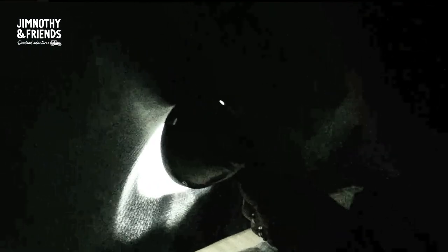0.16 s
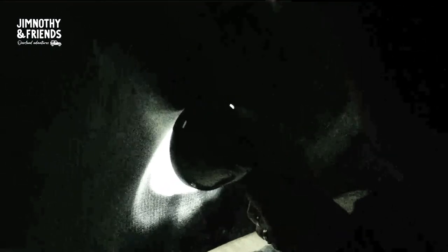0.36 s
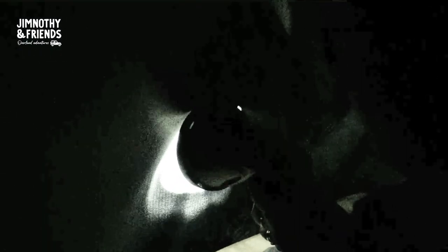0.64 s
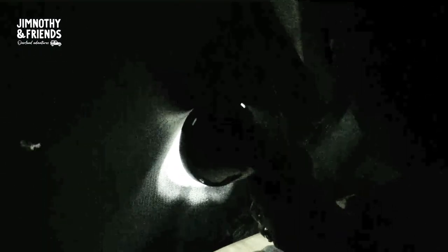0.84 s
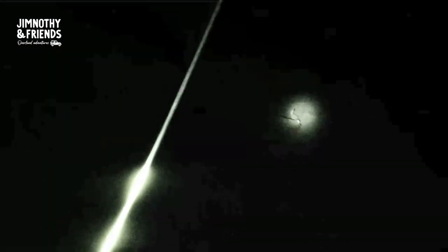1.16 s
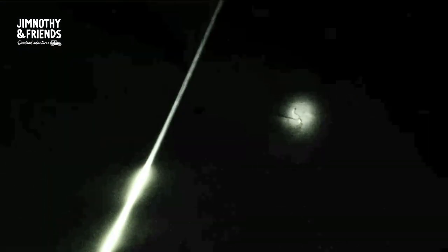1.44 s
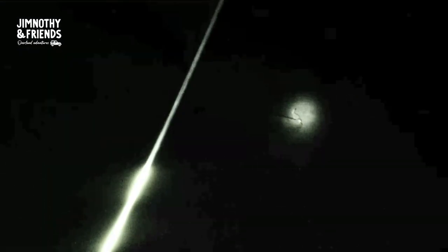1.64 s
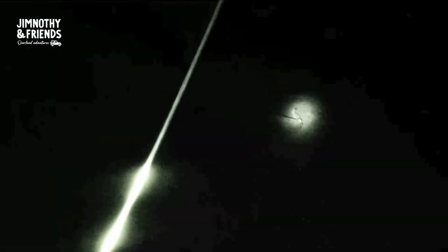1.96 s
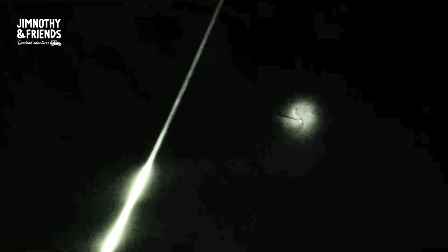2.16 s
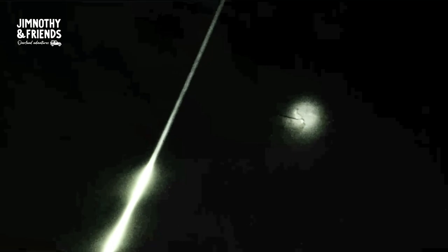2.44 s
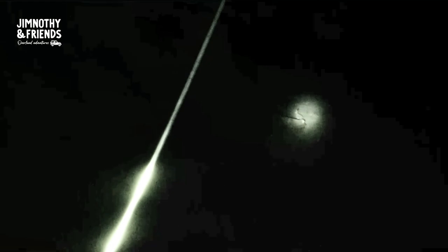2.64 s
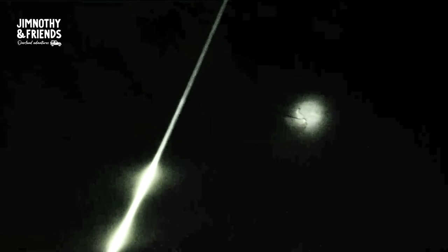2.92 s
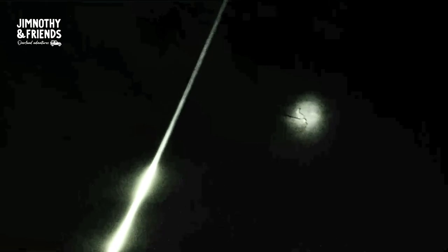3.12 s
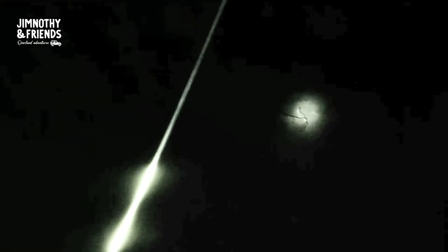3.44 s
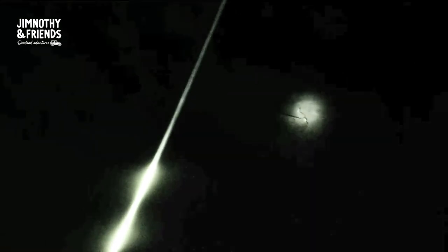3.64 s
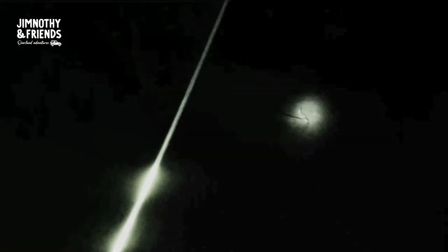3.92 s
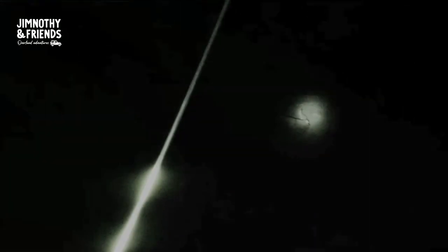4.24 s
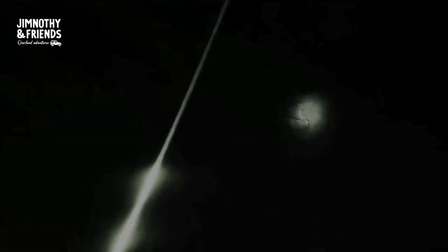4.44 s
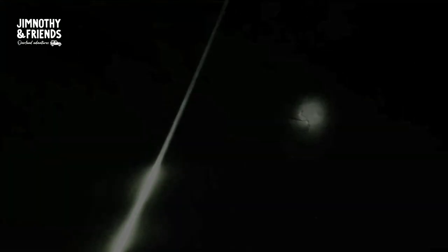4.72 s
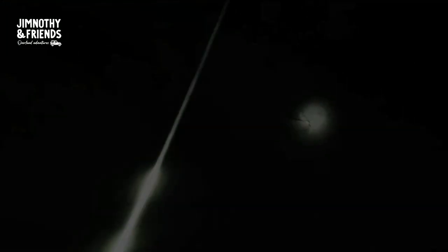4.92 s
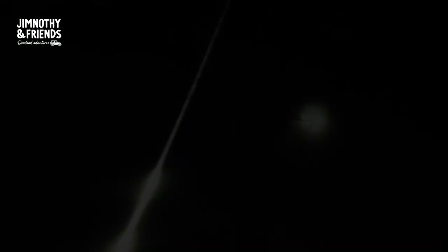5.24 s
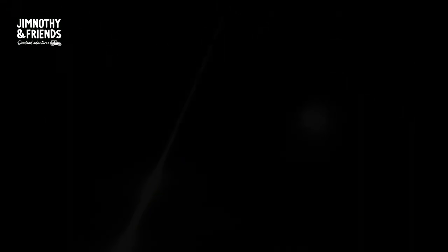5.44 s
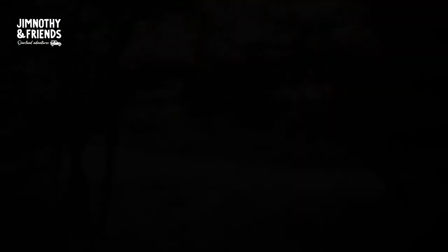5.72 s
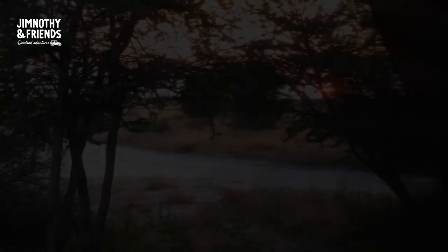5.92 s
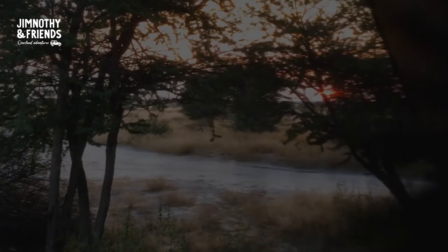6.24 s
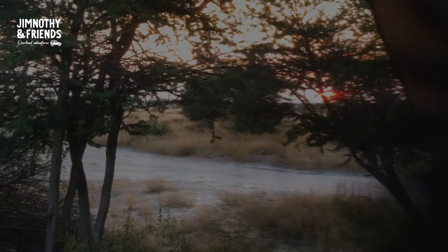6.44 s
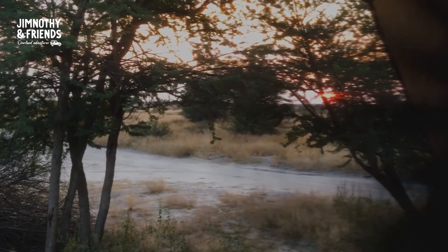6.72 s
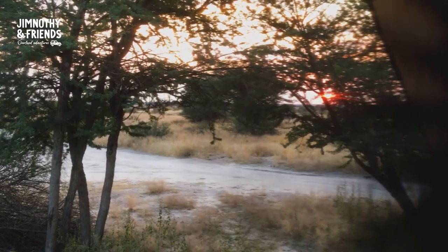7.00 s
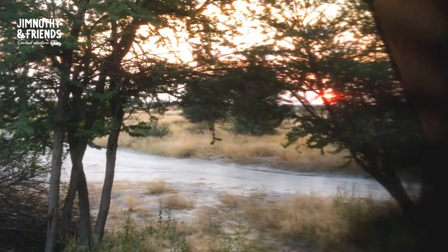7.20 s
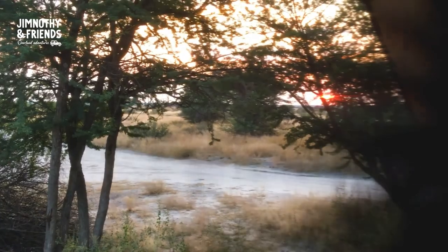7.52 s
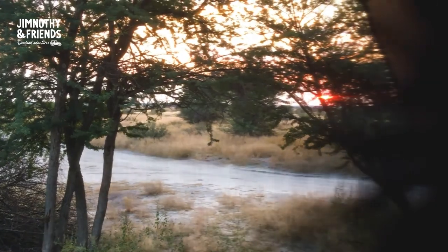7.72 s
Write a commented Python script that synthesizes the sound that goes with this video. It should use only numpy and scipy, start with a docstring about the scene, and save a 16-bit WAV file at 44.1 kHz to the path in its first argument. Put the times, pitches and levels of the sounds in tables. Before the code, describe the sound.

From 0 to about 0.7 s a gecko very near the microphone gives four loud barks about a quarter second apart, each a 20-millisecond rattle of clicks ringing around 4 kHz, with a weaker, shorter caller between. Faint hiss, low rumble and a blurred distant chorus lie beneath. From 1 to 1.8 s four duller, quieter barks come from another gecko; until 3 s only far, echoing barks remain, with tiny high chirps and a faint falling bird note near 2.1 s. At 3.1 s the near gecko returns with five loud barks until 4.2 s, the weaker one alternating. Distant calls follow as everything fades almost to silence by 5.5 s. Morning then fades in: airy wind hiss, low buffeting, soft thuds on the microphone, strongest around 6.8 and 7.3 s. Sparse thin bird notes from 5.9 s lead to a rapid bright trill from 7.27 s, about seventeen notes a second, to the end at 8 s.

```python
"""Open country by night, then morning: one gecko barks close by, others answer over chorus, hiss and rumble.
Barks are bursts of larynx clicks ringing a throat resonance; the chorus is random click bursts, blurred.
Faint high chirps, perhaps an insect, and another bird's note sound in the night, which fades almost to
silence. Morning fades in: wind hiss, buffeting noise and low pulses thud on the microphone, and a small
bird tries a few notes and breaks into a fast trill. Chirps and bird notes are swept sines."""
import sys
import numpy as np
from scipy import signal
from scipy.fft import rfft, irfft, next_fast_len
from scipy.io import wavfile
from scipy.ndimage import uniform_filter1d, map_coordinates

SR = 44100
rng = np.random.default_rng(int(sys.argv[2]) if len(sys.argv) > 2 else 0)


def put_to_file(sound):
    """Save the sound as 16-bit audio at rate SR, in the file named by the first command-line argument."""
    columns = np.atleast_2d(sound).T  # one column per channel
    safe = np.clip(columns, -1, 1)
    whole_steps = np.round(safe * 32767)
    wavfile.write(sys.argv[1], SR, whole_steps.astype(np.int16))


N = 346626

# Diffuse echo decay of open field, near stones and scrub, and trees: (frequency [Hz], t60 [s])
FIELD_T60 = [(500, 0.28), (2000, 0.18), (4200, 0.25), (7000, 0.19), (12000, 0.068)]
SCRUB_T60 = [(500, 0.025), (4200, 0.02), (8000, .025), (14000, 0.032)]
TREES_T60 = [(2000, 0.052), (6000, 0.19), (10000, 0.25)]

# Night noise and far-chorus spectra: (frequency [Hz], relative level [dB])
NIGHT_HISS_SPECTRUM = [(180, -34), (300, -2.5), (1550, -5), (2640, -4.5), (4140, 0.5), (4650, -5),
                       (5050, -15.5), (5870, -8), (7660, -16), (8890, -13), (10300, -18), (12200, -16),
                       (15100, -19.5), (15900, -33)]
RUMBLE_SPECTRUM = [(15, -39), (25, -8), (80, 3.5), (205, -1), (284, -4), (327, -5), (500, -28.5),
                   (650, -38.5), (1100, -120)]
CHORUS_SPECTRUM = [(1200, -23), (2500, -13.5), (3600, -11.5), (4300, 2.5), (4900, -14.5), (6000, -22),
                   (7500, -44)]
# Shared swell of hiss and rumble: (time [s], gain [dB])
NIGHT_SWELL = [(0, 0.5), (1.76, -.3), (2.41, 2.5), (3.1, 1.1), (5.6, -2)]
# Chorus level: (time [s], level [dB])
CHORUS_LEVEL = [(0, -61), (.75, -69), (1.18, -63.5), (2.99, -71), (3.13, -72), (3.3, -56.5), (3.7, -59.5),
                (4.3, -77), (4.9, -67), (5.16, -57.5), (5.6, -55)]

# Morning hiss and wind buffeting spectra: (frequency [Hz], relative level [dB])
AIR_SPECTRUM = [(120, -11), (200, -1.5), (328, -3.5), (646, -10), (707, -11), (948, -12), (1830, -15.5),
                (3480, -15), (4840, -20), (5920, -15), (7510, -19.5), (14200, -15), (15900, -17)]
BUFFET_SPECTRUM = [(12, -36), (20, -19), (44, 3), (70, -3), (99, -8.5), (242, -27), (400, -46), (520, -72),
                   (880, -120)]
# Wind thuds: (centre [s], peak level [dB], frequency [Hz], half length to 1/e [cycles])
WIND_THUDS = [(5.776, -18.5, 134, 0.66), (5.813, -17.5, 117, 0.45), (5.849, -32, 138, 0.64),
              (5.934, -32, 60, 0.6), (6.086, -26, 54.1, 0.7), (6.124, -28, 60, 0.54),
              (6.171, -25, 101.3, 0.36), (6.2, -30.5, 90, 0.3), (6.251, -33, 58.7, 1),
              (6.683, -26.5, 55.5, 0.55), (6.75, -37, 55, .8), (6.84, -15.5, 58.5, 0.29),
              (7.144, -31, 55.4, 0.59), (7.247, -24, 55.5, 0.67), (7.265, -32, 65, 0.27),
              (7.303, -14.5, 76, 0.56), (7.371, -28.5, 55, 0.57), (7.571, -33, 55, 0.55),
              (7.685, -35, 56.4, 0.9), (7.784, -25.5, 60, 0.58)]

# Single whistled notes, faint high chirps of a bird or insect, and bird notes:
# (time [s], level before whistle gain [dB], start [Hz], turn [Hz], end [Hz],
# time to the turn [ms], time after it [ms])
CHIRPS_AND_NOTES = [(.965, -60, 5900, 5900, 5800, 25, 35), (1.955, -57, 5800, 5750, 5700, 11, 11),
                    (2.115, -56, 5900, 5900, 5850, 15, 15), (2.445, -56, 5950, 5880, 5850, 12, 12),
                    (2.095, -43.5, 3760, 3400, 2800, 26, 45), (5.894, -42.5, 4430, 3580, 2480, 16, 33),
                    (6.108, -39.5, 4820, 6970, 4960, 20, 18), (6.344, -43.5, 6400, 6060, 2940, 10, 13),
                    (6.42, -55, 6200, 5300, 4200, 9, 11), (6.584, -43.5, 6040, 6200, 4270, 14, 11),
                    (6.72, -50, 6150, 6100, 5360, 14, 36), (7.106, -41.5, 6080, 6330, 3530, 10, 18),
                    (7.168, -35, 5540, 3800, 2300, 1.5, 2.7), (7.179, -36, 2500, 4630, 4080, 3, 3),
                    (7.184, -30.5, 4060, 4010, 4060, 6.4, 6.7), (7.203, -27.5, 6300, 5690, 2100, 5, 2.7),
                    (7.488, -31.5, 4850, 6210, 5920, 8.6, 17)]
# Trill notes: (time of top [s], level before whistle gain [dB], top before sag [Hz],
# dwell end before stretch [ms], time stretch [ratio], voice stop before stretch [ms])
TRILL_NOTES = [(7.275, -29, 8550, 5.4, .95, 22), (7.329, -28.5, 6280, 5.5, 1.02, 18.6),
               (7.388, -28, 6164, 5, .99, 16), (7.448, -28, 6170, 4.5, 1.01, 21),
               (7.507, -27.5, 6300, 4.5, 1.05, 17.3), (7.569, -27.5, 6400, 3.9, .96, 17),
               (7.629, -27.5, 6360, 4, .98, 18), (7.688, -27, 5850, 4.5, 0.99, 16.5),
               (7.746, -27.5, 6250, 4, 0.96, 22), (7.805, -28.5, 6200, 2.8, 1.1, 15)]
# Trill sweep up to the top, before stretch and sag: (time from top [ms], pitch [Hz])
FLICK_UP = [(-5, 2060), (-0.5, 2320)]
# Trill sweep down, before stretch and sag: (time after dwell [ms], pitch [Hz])
SLIDE_DOWN = [(0, 5800), (2, 4650), (4.5, 4200), (9.5, 3650), (13.5, 2250), (17.5, 2400), (24.5, 2000)]
# Whistle gain by pitch, as a beak rings: (frequency [Hz], gain [dB])
WHISTLE_GAIN = [(2000, -24), (2400, -20.5), (3650, -8.5), (4650, -3.5), (5600, -7.5), (6300, -6.5),
                (9000, -10)]

# Gecko barks: (time [s], voice name, level before common trim [dB], first click gap [ms],
# settled gap before late stretch [ms])
GECKO_BARKS = [(-.0491, "near", -4, 1.95, 2.27), (.0197, "small", -24.5, 1.85, 1.82),
               (0.0959, "far", -39, 2.1, 2.1), (.1670, "near", -3, 1.96, 2.35),
               (.2992, "far", -42.5, 2.1, 2.1), (.3700, "small", -24, 1.86, 1.86),
               (0.3953, "near", -4, 2.03, 2.38), (0.567, "small", -26, 1.86, 1.83),
               (.621, "far", -41, 2.1, 2.1), (0.6444, "near", -4.5, 2.25, 2.42),
               (.8091, "high", -46, 2.1, 2.1), (.9133, "far", -43, 2.1, 2.1),
               (0.993, "big", -29, 3.4, 2.25), (1.04, "mid", -42, 2.6, 2.6), (1.175, "far", -44, 2.2, 2.1),
               (1.2397, "big", -25.5, 3.4, 2.25), (1.266, "far", -46, 1.8, 2.1),
               (1.4992, "big", -25.5, 3.38, 2.3), (1.555, "far", -44, 2.1, 2.1),
               (1.5992, "far", -46, 1.9, 2.3), (1.706, "far", -51, 2.1, 2.1),
               (1.7601, "big", -25, 3.5, 2.25), (1.9784, "low", -45, 2.4, 2.3),
               (2.0313, "far", -46.5, 2.1, 1.9), (2.2037, "low", -43.5, 2.4, 2.3),
               (2.2608, "far", -52, 2.4, 2.1), (2.2862, "high", -42.5, 2, 1.9),
               (2.4259, "low", -43, 2.4, 2.3), (2.5067, "high", -43, 1.7, 1.9),
               (2.6425, "low", -49, 2.4, 2.3), (2.6759, "far", -41.5, 2.1, 2.1),
               (2.725, "high", -46, 1.9, 1.9), (2.8709, "low", -47, 2.4, 2.3),
               (2.9088, "far", -43, 1.8, 2.1), (2.9761, "far", -49, 2.1, 2.1),
               (3.0852, "small", -25, 1.63, 1.58), (3.1013, "near", -3, 1.92, 2.25),
               (3.2453, "small", -26, 1.63, 1.64), (3.306, "near", -2, 1.88, 2.27),
               (3.4145, "small", -26, 1.72, 1.75), (3.5105, "near", -3, 1.95, 2.27),
               (3.5799, "small", -25, 1.85, 1.82), (3.6553, "far", -39.5, 2.1, 2.1),
               (3.7270, "near", -3, 1.96, 2.35), (3.8586, "far", -43, 2.1, 2.1),
               (3.9300, "small", -24.5, 1.86, 1.86), (3.956, "near", -3.5, 2.03, 2.38),
               (4.128, "small", -25.5, 1.86, 1.83), (4.181, "far", -42.5, 2.1, 2.1),
               (4.2042, "near", -4.5, 2.25, 2.42), (4.3934, "high", -48.5, 1.7, 1.9),
               (4.4346, "far", -47.5, 1.8, 2.1), (4.495, "far", -53, 2.1, 2.3),
               (4.6087, "mid", -35.5, 1.9, 2.1), (4.7985, "far", -49, 1.9, 1.8),
               (4.8268, "mid", -36.5, 2.04, 1.95), (5.0517, "mid", -41, 2, 2.4),
               (5.1023, "high", -38, 1.9, 1.9), (5.1342, "far", -42.5, 2, 2.2),
               (5.219, "mid", -33.5, 2.1, 2.1), (5.29, "high", -35.5, 1.9, 1.9),
               (5.4286, "mid", -35, 1.9, 2), (5.484, "high", -40, 2.2, 2.1)]
# Voice by name: (bark length [ms], mid-bark throat pitch [Hz], throat width [Hz],
# snap [dB], chest tone [dB], echo [dB], treble loss [dB]); snap and echo precede common trims
GECKO_VOICES = {"near": (23, 4109.5, 126, 1.5, -30, -17.5, -1.5),
                "big": (27, 4031, 260, 8.5, -10, -10.5, -17),
                "small": (13, 4329, 400, -11.5, -29.5, -8.5, -8),
                "far": (20, 4150.5, 260, -6.5, -27.5, -2, -10.5),
                "mid": (24, 4087, 400, 0.5, -17.5, -1, -8.5), "low": (22.5, 3695, 600, 1, -23, -4, -16),
                "high": (15, 4650, 600, -5, -30, -11, 0)}
# Throat resonances: (multiple of throat pitch [ratio], multiple of throat width [ratio], level [dB])
THROAT_MODES = [(0.999, 1.0, 9), (1.121, 4.5, -30.5)]
# Snap spectrum of one larynx click: (frequency [Hz], level [dB])
SNAP_SPECTRUM = [(150, -58), (420, -25.5), (600, -31.5), (900, -17.5), (1800, -6), (2100, -6.5), (3300, -1),
                 (4600, 0.5), (5800, -9), (7500, -19.5), (10000, -33), (16000, -45)]

HISS_DB, RUMBLE_DB = -74.5, -69  # before the night swell
AIR_DB, LULL_DB = -54, -49.5  # morning hiss; buffeting between thuds
CHURN_DB, CHURN_DB_PER_THUD_DB, CHURN_HALF_LENGTH_S = -31, 0.48, 0.043  # buffeting around a thud
TOP_HOLD_MS, FLICK_DB, SAG_PER_S = 0.98, -5, 0.072  # hold before stretch; weak way up; share of pitch lost
DWELL_HZ = 6080  # ceiling of the dwell pitch, before sag
NOTE_ENDS_DB = -6.5  # ends of a chirp or single note relative to its turn
THROAT_SAG = 0.015  # share of throat pitch lost over a bark
CUT_S, FADE_OUT_S, FADE_IN_S = 5.507, 0.72, 0.79  # night ends, morning begins at the cut
FADE_LEFT_GAIN, FADE_IN_POWER = 0.024, 0.88  # night gain left at the cut; fade-in curve
TOP_HZ = 15950


def amp(db):
    """Gain of a level in dB."""
    return 10 ** (np.asarray(db) / 20)


def unit(x):
    """x at rms 1."""
    return x / np.sqrt(np.mean(x ** 2) + 1e-20)


def along(points, hz):
    """Interpolate (Hz, value) points on a log frequency axis."""
    f, v = np.transpose(points)
    return np.interp(np.log(hz + 1), np.log(f + 1), v)


def level_gain(points):
    """Gain per sample from (s, dB) points; silent outside their times."""
    s, db = np.transpose(points)
    return amp(np.interp(np.arange(N) / SR, s, db, left=-200, right=-200))


def wobble(knots_per_s):
    """Smooth random curve through normally distributed knots."""
    knots = rng.standard_normal(int(N * knots_per_s / SR) + 4)
    return map_coordinates(knots, [np.arange(N) * knots_per_s / SR])


def noise(spectrum, lo_hz, hi_hz):
    """Coloured noise whose band lo-hi has rms 1."""
    m = next_fast_len(N)
    hz = np.fft.rfftfreq(m, 1 / SR)
    coloured = rfft(rng.standard_normal(m)) * amp(along(spectrum, hz))
    band = irfft(coloured * (hz > lo_hz) * (hz < hi_hz), m)
    return irfft(coloured, m)[:N] / np.std(band)


def causal(spectrum, size):
    """Minimum-phase response of a (Hz, dB) shape, by folding its cepstrum."""
    hz = np.fft.rfftfreq(size, 1 / SR)
    cepstrum = irfft(np.log(amp(along(spectrum, hz))), size)
    cepstrum[1:size // 2] *= 2
    cepstrum[size // 2 + 1:] = 0
    return np.exp(rfft(cepstrum))


def resonance(f, centre_hz, width_hz):
    """Second-order band-pass response, gain 1 at its centre."""
    return 1j * f * width_hz / (centre_hz ** 2 - f * f + 1j * f * width_hz)


def echoes(x, decays, delay_s):
    """Convolve with a fresh noise tail of energy 1, each frequency decaying at its own t60."""
    hz, t, z = signal.stft(rng.standard_normal(SR // 4), SR, nperseg=128)
    decay = amp(-60 * t / along(decays, hz)[:, None])
    tail = signal.istft(z * decay, SR, nperseg=128)[1]
    delayed = np.pad(x, (round(delay_s * SR), 0))
    return signal.fftconvolve(delayed, tail / np.linalg.norm(tail))


def add(out, s, x):
    """Mix x into out from time s, clipped to both ends."""
    at = round(s * SR)
    part = out[max(at, 0):][:max(len(x) + min(at, 0), 0)]
    part += x[max(-at, 0):][:len(part)]


def chorus(count=300):
    """Many far geckos: click bursts at chance times, rates and strengths, blurred by distance."""
    draw = rng.random((count, 3))
    k = np.arange(7)
    gap_s = 0.001 + 0.0046 * draw[:, 1:2]
    at = (draw[:, :1] * N + gap_s * SR * k).astype(int)
    force = amp(15 * draw[:, 2:] ** 3 - .8 * k)
    clicks = np.bincount(at.ravel(), force.ravel(), N + SR)[:N]
    m = next_fast_len(N)
    colour = amp(along(CHORUS_SPECTRUM, np.fft.rfftfreq(m, 1 / SR)))
    calls = irfft(rfft(clicks, m) * colour, m)[:N]
    near_blur = echoes(calls, SCRUB_T60, 0)[:N]
    far_blur = echoes(calls, FIELD_T60, 0.0028)[:N]
    return unit(near_blur + amp(-3.5) * far_blur)


def night():
    """Coloured-noise hiss and low rumble swelling together, plus the far chorus."""
    hiss = amp(HISS_DB) * noise(NIGHT_HISS_SPECTRUM, 8060, 13200)
    rumble = amp(RUMBLE_DB) * noise(RUMBLE_SPECTRUM, 40, 400)
    return level_gain(NIGHT_SWELL) * (hiss + rumble) + level_gain(CHORUS_LEVEL) * chorus()


def wind():
    """Air hiss, single pressure thuds, and lumpy buffeting that churns up around each thud."""
    now = np.arange(N) / SR
    churn = amp(LULL_DB)
    for s, db, *_ in WIND_THUDS:
        swell = np.exp(-((now - s) / CHURN_HALF_LENGTH_S) ** 2)
        churn = churn + amp(CHURN_DB + CHURN_DB_PER_THUD_DB * db) * swell
    lumps = unit(amp(2.2 * wobble(30)))
    hiss = amp(AIR_DB) * noise(AIR_SPECTRUM, 300, 15000)
    out = hiss + churn * lumps * noise(BUFFET_SPECTRUM, 25, 250)
    t = np.arange(-SR // 20, SR // 20) / SR
    for s, db, hz, cycles in WIND_THUDS:
        envelope = np.exp(-(hz * t / cycles) ** 2)
        add(out, s + t[0], -amp(db) * np.cos(2 * np.pi * hz * t) * envelope)
    return out


def chirps_and_notes():
    """Paths (times s, pitches Hz, levels dB) of chirps and bird notes that swell to a turn and die."""
    paths = []
    for s, db, *hz, before_ms, after_ms in CHIRPS_AND_NOTES:
        times = s + np.cumsum([0, before_ms, after_ms]) / 1000
        paths.append((times, hz, db + NOTE_ENDS_DB * np.array([1, 0, 1])))
    return paths


def trill():
    """Paths of repeated notes: flick up, hold the top, dwell, slide down; pitch sags note by note."""
    paths = []
    for s, db, top_hz, dwell_ms, stretch, stop_ms in TRILL_NOTES:
        top = [(0, top_hz), (TOP_HOLD_MS, top_hz), (2 * TOP_HOLD_MS, min(top_hz, DWELL_HZ))]
        slide = [(dwell_ms + after_ms, slide_hz) for after_ms, slide_hz in SLIDE_DOWN]
        ms, hz = np.transpose(FLICK_UP + top + slide)
        sag = 1 - SAG_PER_S * (s - TRILL_NOTES[0][0])
        level_db = db + FLICK_DB * (ms < 0) - 8 * np.clip(ms - stop_ms, 0, None)
        paths.append((s + stretch * ms / 1000, sag * hz, level_db))
    return paths


def whistle(s, hz, db):
    """A sine along a pitch and level path, weighted by gain at its pitch, with soft ends."""
    t = np.arange(s[0], s[-1], 1 / SR)
    edge = np.clip(np.minimum(t - s[0], s[-1] - t) / 0.00034, 0, 1)
    pitch_hz = uniform_filter1d(np.interp(t, s, hz), size=40, mode="nearest")
    gain = amp(np.interp(t, s, db) + along(WHISTLE_GAIN, pitch_hz))
    return edge * gain * np.sin(2 * np.pi * np.cumsum(pitch_hz) / SR)


def whistlers():
    """Faint chirps, bird notes and the trill, each whistle with a ground reflection and tree echoes."""
    out = np.zeros(N)
    for s, hz, db in chirps_and_notes() + trill():
        note = whistle(s, hz, db)
        far = np.clip((-37 - max(db)) / 8, 0, 1)  # faint notes come from far and are mostly echo
        add(out, s[0], amp(-6 * far) * note)
        add(out, s[0] + 0.0023, amp(-4.5) * note)  # off the ground
        add(out, s[0], amp(-4 + 5 * far) * echoes(note, TREES_T60, 0.0036))
    return out


def geckos(size=4096, count=16):
    """A bark is a burst of larynx clicks: each a broad snap that also rings the throat."""
    out, f, k = np.zeros(N), np.fft.rfftfreq(size, 1 / SR), np.arange(count)
    snap = causal(SNAP_SPECTRUM, size)
    ring_band = f ** 2 / (f ** 2 + 2500 ** 2) / (1 + (f / 5600) ** 6)
    ground = 1 + 0.16 * np.exp(-2j * np.pi * f * 0.001216)
    for s, gecko, db, first_ms, settled_ms in GECKO_BARKS:
        length_ms, throat_hz, width_hz, snap_db, chest_db, echo_db, dull_db = GECKO_VOICES[gecko]
        # gaps settle, quickly when they widen, then stretch as the breath runs out
        settling = .4 if first_ms < settled_ms else .74
        gaps_ms = settled_ms * (1 + .18 * (k / 7) ** 3) + (first_ms - settled_ms) * settling ** k
        ms = np.cumsum(gaps_ms) - gaps_ms + .015 * rng.standard_normal(count)
        force = amp(-7 * ms / length_ms + 0.54 * rng.standard_normal(count))
        force = force / (1 + (np.abs(ms) / length_ms) ** 12)
        # later clicks lose treble
        duller = amp(-14 * np.outer(ms / length_ms, np.clip((f - 3000) / 4000, 0, 1)))
        delays = np.exp(-2j * np.pi * np.outer(ms + .5, f) / 1000)
        clicks = force[:, None] * (duller * delays)

        body = amp(snap_db - 10.5) * snap + amp(chest_db) * resonance(f, 1950, 450)
        progress = np.clip(ms / length_ms, 0, 1)[:, None]
        sagging_hz = throat_hz * (1 - THROAT_SAG * (progress - .5))
        ring = sum(amp(mode_db) * resonance(f, ratio * sagging_hz, width * width_hz)
                   for ratio, width, mode_db in THROAT_MODES) * ring_band
        treble_loss = amp(dull_db * np.clip((f - 4700) / 1100, 0, 1))

        # the throat ring beams forward; the field hears less of it
        forward = (clicks * (body + ring)).sum(0)
        sideways = (clicks * (body + amp(-9.5) * ring)).sum(0)
        bark = -irfft(ground * treble_loss * forward, size)
        field_bark = -irfft(ground * treble_loss * sideways, size)
        gain = amp(db + 0.44) / np.abs(bark).max()
        bark, field_bark = gain * bark, gain * field_bark
        add(out, s, bark)
        add(out, s, amp(-3.5) * echoes(bark, SCRUB_T60, 0.001014))
        add(out, s, amp(echo_db + 2) * echoes(field_bark, FIELD_T60, .003))
    return out


def scene():
    """Night fades out to the cut, where morning starts to fade in."""
    t = np.arange(N) / SR - CUT_S
    whistles = whistlers()
    dark = np.clip(FADE_LEFT_GAIN - t / FADE_OUT_S, 0, 1) * (t < 0)
    dawn = np.clip(t / FADE_IN_S, 0, 1) ** FADE_IN_POWER
    return (dark * (geckos() + night() + whistles) + dawn * (whistles + wind()))[None]


def record(dry):
    """The microphone drops the deepest bass; nothing is kept above the band limit."""
    m = next_fast_len(N + SR // 4)
    hz = np.fft.rfftfreq(m, 1 / SR)
    response = hz ** 4 / (hz ** 4 + 26 ** 4) * (hz < TOP_HZ)
    return irfft(rfft(dry, m) * response, m)[:, :N]


dry = scene()
out = record(dry)
put_to_file(out)
```